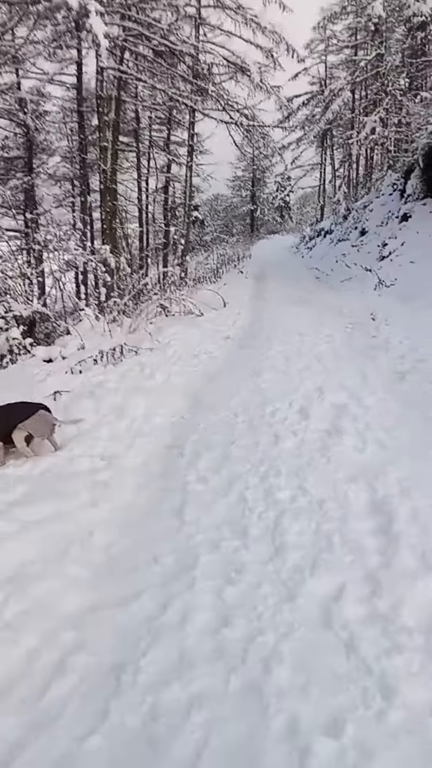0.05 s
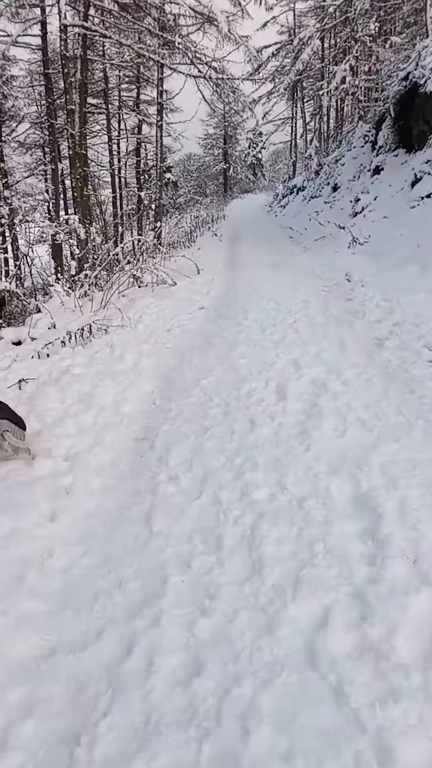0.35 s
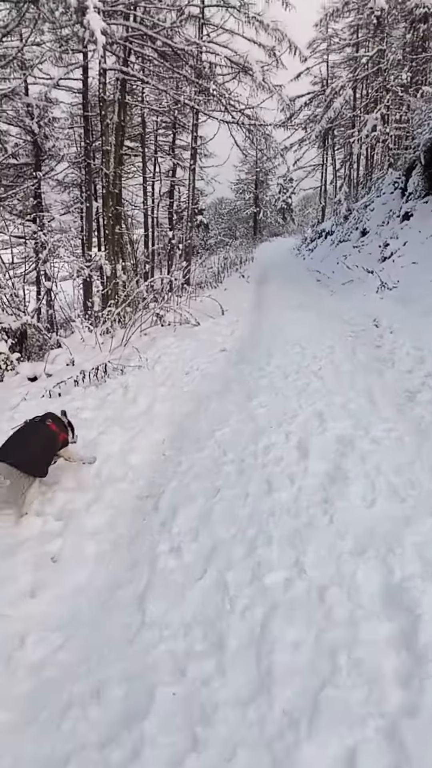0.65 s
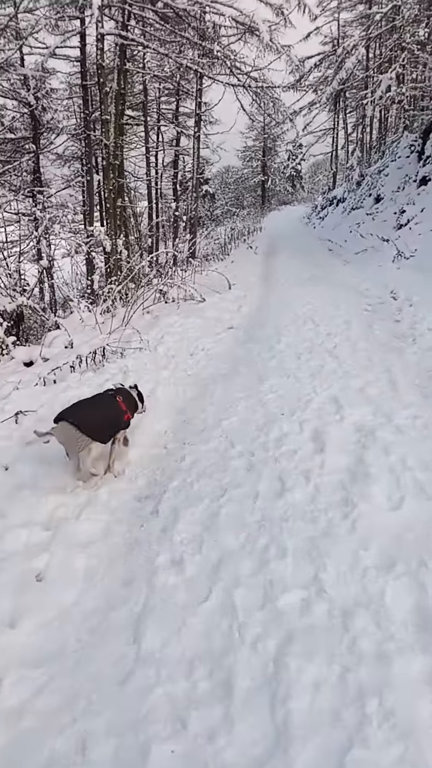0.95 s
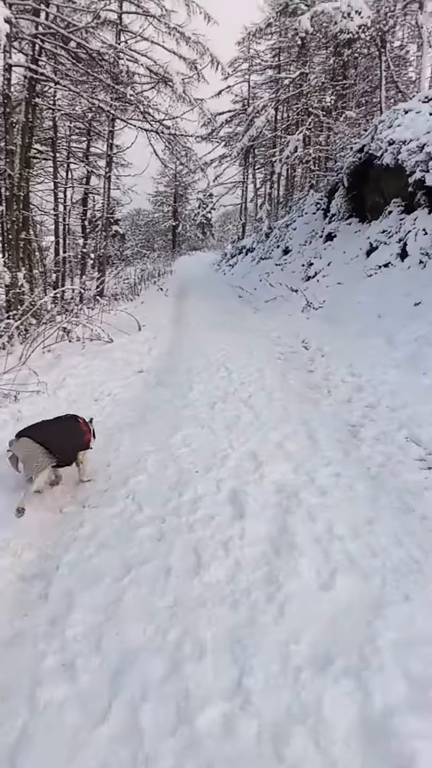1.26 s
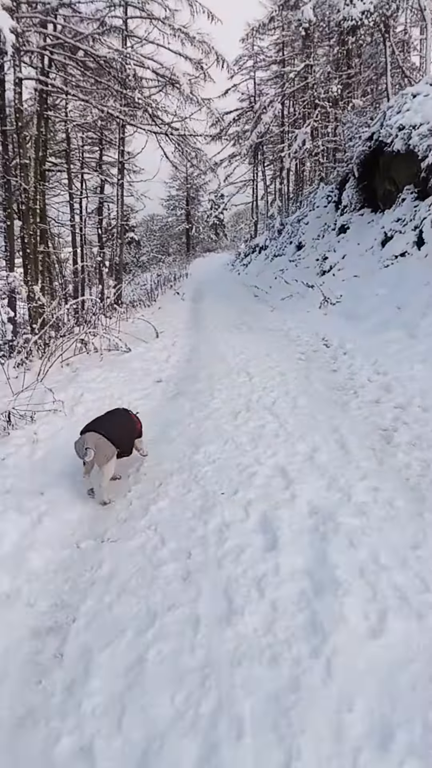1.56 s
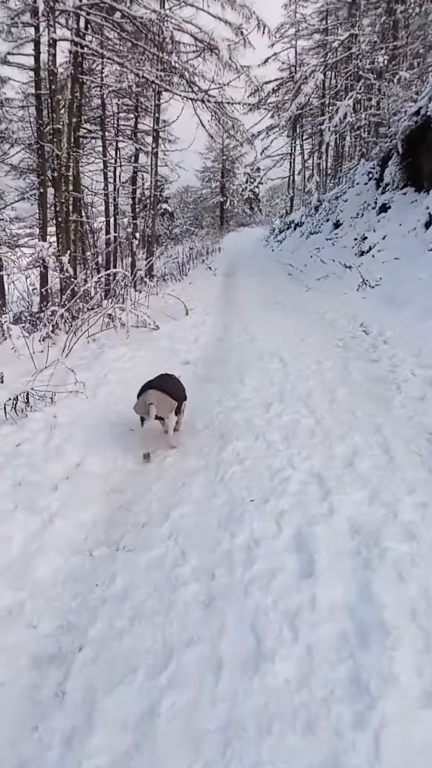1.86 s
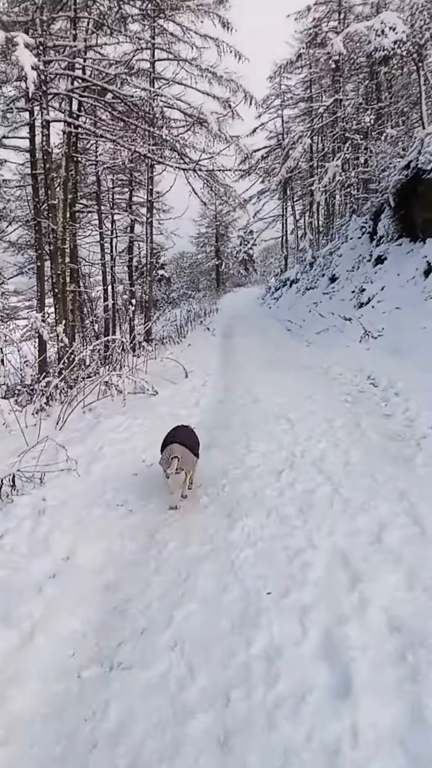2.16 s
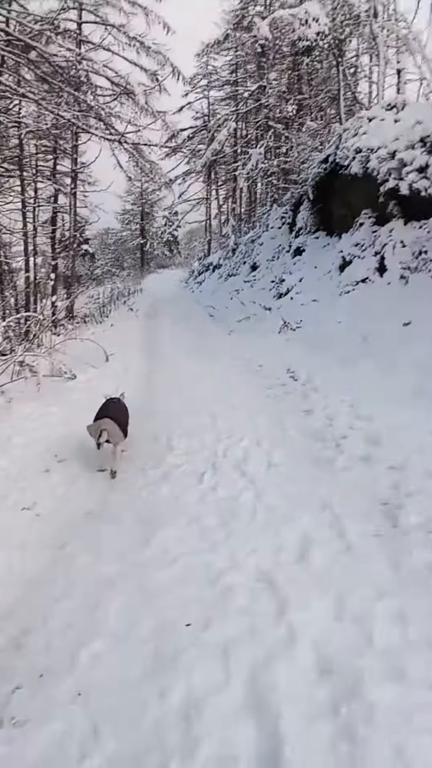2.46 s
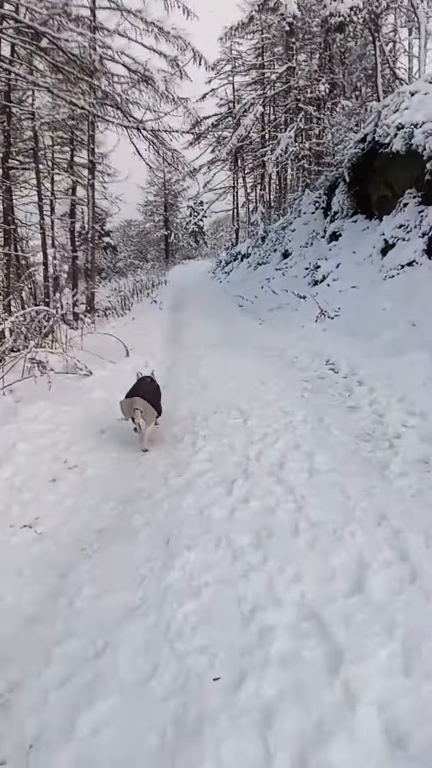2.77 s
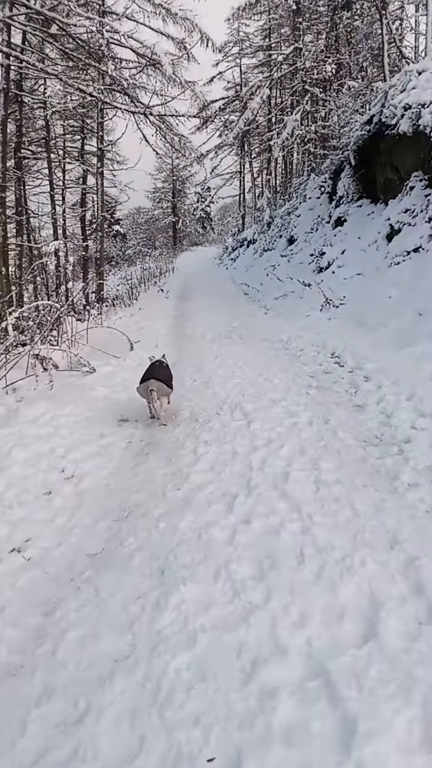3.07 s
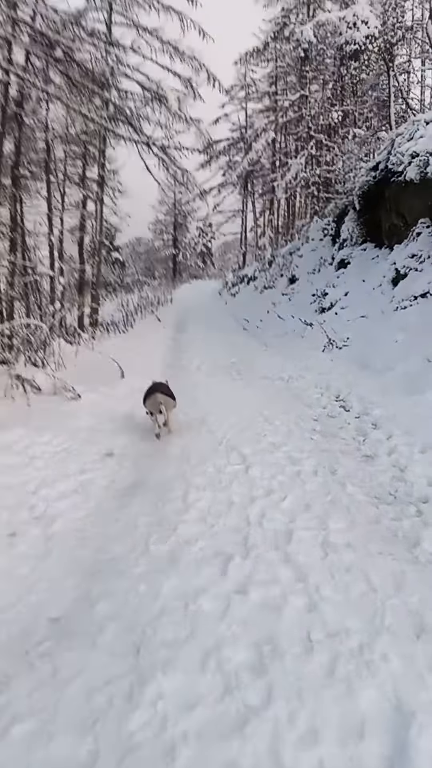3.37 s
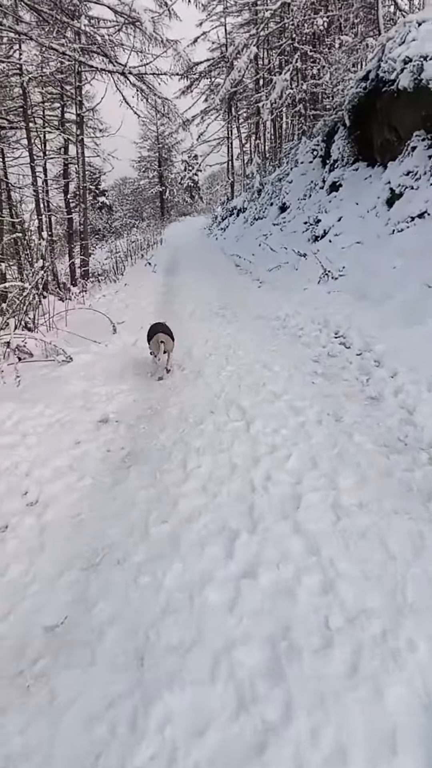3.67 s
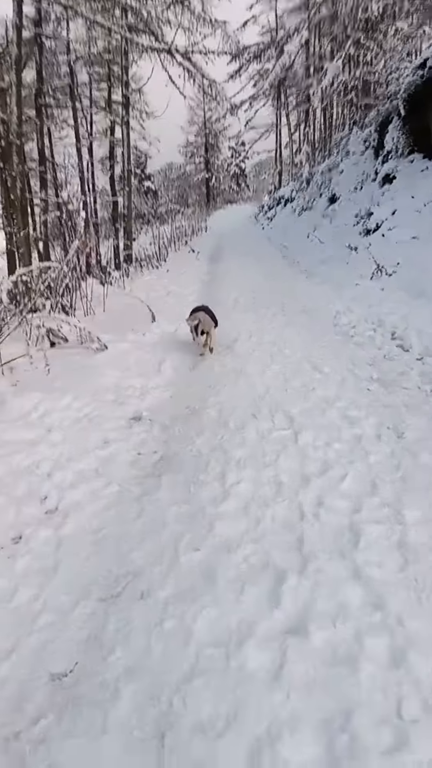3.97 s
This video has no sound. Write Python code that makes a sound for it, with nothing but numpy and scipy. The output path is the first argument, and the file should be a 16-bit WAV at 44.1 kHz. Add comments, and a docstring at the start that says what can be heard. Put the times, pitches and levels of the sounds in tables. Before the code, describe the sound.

A brief rub of a hand on the phone opens a walk through snow in quiet woods. Close, regular footsteps follow, each breaking the crust and packing the snow with a dry crunch, some joined by small squeaks after about two seconds. Soft fabric swishes fall between the steps. Light wind rumbles unevenly on the handheld microphone throughout, with a faint hiss behind it and no echo.

```python
"""A walk along a snowy woodland track, phone in hand. At first the hand rubs the case as a boot lands.
Steps follow at an even pace, nearly two a second: the heel breaks the crust, then the sole packs the
snow with a dull crunch and a spray of powder, while lumps give way with short knocks and ice ticks.
Clothes swish between steps, and from about two seconds on firm snow squeaks under the twisting boot.
To the end, moving air buffets the microphone over a faint hiss."""
import sys
import numpy as np
from scipy import signal
from scipy.fft import rfft, irfft, next_fast_len
from scipy.io import wavfile
from scipy.ndimage import uniform_filter1d

SR = 44100
rng = np.random.default_rng(int(sys.argv[2]) if len(sys.argv) > 2 else 0)


def materialize(psi):
    """Save the field psi as 16-bit PCM at rate SR to the path in sys.argv[1].

    A 1-D psi becomes a single channel; in a 2-D psi each row is a channel.
    """
    bounded = np.clip(np.atleast_2d(psi).T, -1, 1)
    quanta = np.round(bounded * 32767).astype(np.int16)
    wavfile.write(sys.argv[1], SR, quanta)


N = 313992
TIME = np.arange(N) / SR

# Levels are relative within each table; each source applies its own gain afterwards.
# footfalls: (time [s], attack [s], sole press [s], release [s],
# heel level [dB], sole level [dB], grit relative to heel and sole [dB], powder level [dB])
FOOTFALLS = [(0, 0.071, 0.049, 0.1, -46.5, -52, -5, -53), (0.523, 0.028, 0.11, 0.04, -45, -48.5, -3.5, -51),
             (1.054, 0.02, 0.11, 0.039, -69, -47.5, -1, -53),
             (1.625, 0.048, 0.11, 0.075, -48, -47, -7, -51),
             (2.181, 0.015, 0.13, 0.076, -78, -45.5, -2, -50.5),
             (2.712, 0.062, 0.095, 0.065, -64, -45, -5.5, -53),
             (3.308, 0.028, 0.12, 0.057, -50, -49, -4.5, -53),
             (3.885, 0.017, 0.093, 0.097, -46, -49, -8.5, -51),
             (4.457, 0.034, 0.11, 0.059, -42.5, -52.5, -6.5, -51.5),
             (5.003, 0.017, 0.16, 0.022, -42.5, -46.5, -6.5, -52),
             (5.566, 0.023, 0.16, 0.015, -37, -51, -8, -52.5),
             (6.146, 0.017, 0.089, 0.1, -39.5, -47, -7, -52.5),
             (6.613, 0.032, 0.081, 0.04, -72, -47.5, -1, -57.5)]
# spectrum of snow collapsing at depth: (frequency [Hz], level [dB])
GROAN_SPECTRUM = [(130, -32), (220, -3), (330, 6), (520, 5.5), (700, 3), (830, -0.5), (1000, -63),
                  (2500, -60)]
# spectrum of the breaking crust: (frequency [Hz], level [dB])
GRIT_SPECTRUM = [(600, -23), (950, -5.5), (1300, 5.5), (2000, -1.5), (2650, -0.5), (3100, -19),
                 (4000, -3.5), (6000, -41)]
# spectrum of spraying crystals: (frequency [Hz], level [dB])
POWDER_SPECTRUM = [(500, -2), (1000, -1.5), (2600, -2.5), (7000, -0.5), (10000, -3.5), (12000, -7),
                   (16000, -10.5)]
# knocks of lumps under the boot and of the hand on the case: (time [s], level [dB], pitch [Hz])
LUMP_KNOCKS = [(.158, -14.5, 820), (.386, -33, 392), (.52, -30, 480), (1.069, -21.5, 690),
               (1.089, -29, 790), (1.108, -24, 590), (1.605, -25.5, 387), (2.168, -32.5, 874),
               (2.2025, -26, 394), (2.245, -29, 620), (2.269, -30, 563), (2.719, -17, 684),
               (2.734, -38, 650), (2.7695, -37, 444), (2.777, -23.5, 422), (2.891, -36, 490),
               (3.340, -27.5, 654), (3.9, -30.5, 1340), (4.435, -39, 400), (4.476, -24, 630),
               (4.493, -29.5, 480), (5.0075, -27.5, 580), (5.042, -31.5, 404), (5.565, -31, 487),
               (5.572, -24, 1230), (5.606, -33, 517), (6.147, -31, 680), (6.178, -31, 485),
               (6.61, -30.5, 760), (6.634, -27, 480), (6.663, -28, 790)]
# sharp ticks of ice and of the hand on the case: (time [s], level [dB], pitch [Hz])
ICE_TICKS = [(.0805, -30.5, 3730), (.1587, -29, 1410), (.1795, -24.5, 4970), (.5665, -23, 4430),
             (.646, -35, 1370), (1.9945, -41.5, 7200), (2.2027, -31.5, 2200), (2.7193, -30, 1680),
             (3.4285, -27.5, 13000), (3.9885, -28, 12500), (5.105, -41, 2460), (5.926, -47.5, 2570),
             (6.252, -35, 13300)]
# squeaks of packed snow: (time [s], duration [s], level [dB], pitch [Hz])
SNOW_SQUEAKS = [(2.23, .035, -58, 1800), (2.697, .025, -58, 2050), (2.895, 0.047, -59, 563),
                (2.905, 0.044, -71, 1020), (3.076, 0.042, -66.5, 540), (3.288, 0.063, -65.5, 1070),
                (3.89, .02, -56, 2300), (4.475, 0.011, -51, 1270), (4.81, 0.044, -71, 1095),
                (5.136, 0.059, -65, 610), (5.139, 0.039, -61.5, 1220), (5.502, 0.03, -69.5, 1160),
                (5.569, 0.011, -46.5, 1520), (6.577, 0.036, -62, 850), (6.662, 0.016, -53.5, 1870),
                (6.694, 0.064, -59, 644)]
# slides of the hand on the case: (time [s], duration [s], starting level [dB], slope [dB/s])
HAND_RUBS = [(.005, 0.086, -49.5, -28), (0.157, 0.012, -39, -250), (0.1775, 0.057, -37.5, 75),
             (0.23, 0.14, -53.5, -67), (0.386, 0.045, -43.5, -500), (0.438, 0.012, -43.5, -150)]
# spectrum of skin friction: (frequency [Hz], level [dB])
RUB_SPECTRUM = [(300, 4.5), (750, 2.5), (2800, -4.5), (5500, 0.5), (8500, -9.5), (16000, -6)]
# the narrowing hollow between hand and microphone port: (time [s], resonance [Hz])
HAND_HOLLOW = [(.08, 6320), (.44, 7670)]
# swishes as the legs and arms pass: (centre time [s], half duration [s], level [dB])
CLOTH_SWISHES = [(0.806, 0.17, -70.5), (1.228, 0.033, -63.5), (1.985, 0.26, -66), (2.61, 0.11, -67),
                 (2.91, 0.073, -71), (3.096, 0.15, -70), (3.61, 0.012, -67), (3.672, 0.032, -62.5),
                 (4.146, 0.027, -67.5), (4.219, 0.071, -62.5), (4.423, 0.038, -63), (4.81, 0.074, -65),
                 (5.32, 0.13, -70.5), (5.875, 0.065, -64), (6.112, 0.068, -63.5), (6.39, 0.057, -66.5),
                 (6.512, 0.035, -72), (6.75, 0.042, -57.5), (6.927, 0.028, -68), (7.023, 0.044, -64.5)]
# spectrum of fabric friction: (frequency [Hz], level [dB])
CLOTH_SPECTRUM = [(200, -3), (600, 9.5), (1000, 4), (1800, 5.5), (4500, 4.5), (7300, 6), (9500, -2.5),
                  (16000, -2)]
# buffets of air on the microphone: (time [s], duration [s], level [dB])
AIR_BUFFETS = [(0.23, 0.18, -45.5), (0.397, 0.26, -48.5), (0.691, 0.079, -48.5), (0.894, 0.024, -55.5),
               (1.031, 0.12, -53), (1.212, 0.069, -52.5), (1.453, 0.4, -43), (1.833, 0.27, -49),
               (2.15, 0.13, -43), (2.328, .11, -46.5), (2.511, 0.28, -56), (2.877, 0.14, -55.5),
               (3.067, 0.14, -58.5), (3.657, 0.02, -50), (3.724, 0.065, -56), (3.978, 0.19, -43.5),
               (4.323, 0.12, -51.5), (4.504, 0.099, -57), (4.987, 0.14, -48), (5.532, 0.28, -49),
               (5.734, 0.096, -41.5), (5.818, 0.13, -43.5), (5.98, 0.23, -49.5), (6.153, 0.2, -49),
               (6.395, 0.14, -50.5), (6.603, 0.11, -55), (6.802, 0.235, -55.5)]
# single eddies striking the microphone: (centre time [s], level [dB], pitch [Hz])
AIR_EDDIES = [(0.29, -35.5, 128), (0.352, -39, 96.4), (0.56, -41, 238), (0.75, -51, 147),
              (1.289, -40.5, 96), (1.406, -41, 79.4), (1.477, -33.5, 128.7), (1.5, -40.5, 219),
              (1.566, -35, 224), (1.613, -40, 147), (1.851, -41, 220), (1.922, -38.5, 90),
              (1.981, -41.5, 80), (2.337, -40, 96), (2.423, -53.5, 198), (2.678, -43, 136),
              (4.017, -42, 119), (4.085, -32, 130.3), (4.352, -45.5, 81.4), (5.003, -40.5, 237),
              (5.565, -35, 232), (5.658, -44.5, 200), (5.75, -34.5, 119), (5.792, -31, 121.4),
              (6.172, -35, 229), (6.264, -36.5, 180), (6.342, -39, 343), (6.523, -43.5, 156)]
# spectrum of turbulence at the port: (frequency [Hz], level [dB])
WIND_SPECTRUM = [(20, -91), (50, -10), (75, -3.5), (125, 2.5), (165, -7), (220, -17), (320, -59),
                 (600, -60)]
# spectrum of the open air: (frequency [Hz], level [dB])
AIR_SPECTRUM = [(20, -31), (60, 17.5), (130, -9), (250, 11.5), (550, 6), (1000, 0.5), (7000, -1),
                (16000, -10.5)]
# response of the microphone port, resonant near 7 and 15 kHz: (frequency [Hz], gain [dB])
PORT_RESPONSE = [(4800, -4), (6000, 2), (7250, 6), (8100, -9.5), (10000, -3.5), (11200, -10), (13800, -11),
                 (15000, 8), (15800, -5)]

HEEL_HOLD_S, HEEL_RELEASE_S = 0.017, 0.052
HEEL_GRIT_DB, HEEL_SPRAY_DB = 2.5, -8.5  # the heel cracks extra crust and kicks up a little powder
CUSHION_S = 0.0013  # soft snow gives this long before the crust breaks
PACKING_DB_PER_S = -51  # the sole quietens as the snow firms up
POWDER_LAG_S, POWDER_ARCH_DB, POWDER_DB_PER_S = 0.008, 5, -8.5  # the spray is fullest in mid-roll
CUTOFF_HZ = 15900


def footsteps():
    """Brittle collapse: many small failures sum to a deep groan, a gritty crust and a powder spray."""
    weight, breaking, spray = tread()
    collapses = grains(per_s=520, spread_db=2.8)
    crust = collapses + slips() + from_db(3) * grains(per_s=1400, spread_db=3)
    groan = flicker(colour(boot_reflection(collapses), GROAN_SPECTRUM), depth_db=4.5, per_s=35, bands=21)
    grit = flicker(colour(boot_reflection(crust), GRIT_SPECTRUM), depth_db=4.5, per_s=35, bands=31)
    crystals = colour(grains(per_s=8300, spread_db=2.0), POWDER_SPECTRUM)
    crystals = flicker(crystals, depth_db=3.5, per_s=50)
    groan = weight * steady(groan, 280, 900, window_s=0.025)
    grit = breaking * steady(grit, 1000, 2900, window_s=0.03)
    crystals = spray * steady(crystals, 3300, 8000, window_s=0.025)
    return from_db(-1.5) * groan + from_db(-5.5) * grit + from_db(-7.5) * crystals


def tread():
    """Incoherent addition: heel and sole sum in power into envelopes of packing, breaking and spray."""
    weight = breaking = spray = 0
    for s, attack, press, release, heel_db, sole_db, grit_db, powder_db in FOOTFALLS:
        heel = from_db(heel_db) * swell(s, HEEL_HOLD_S, attack, HEEL_RELEASE_S)
        cushion = from_db(heel_db) * swell(s - CUSHION_S, HEEL_HOLD_S + CUSHION_S, attack, HEEL_RELEASE_S)
        sole = from_db(sole_db) * swell(s, press, attack, release, PACKING_DB_PER_S)
        roll = np.clip((TIME - s) / (press + release / 2), 0, 1)
        spray_s = press - POWDER_LAG_S + 0.24 * release
        powder = swell(s + POWDER_LAG_S, spray_s, 1.7 * attack, 1.02 * release, POWDER_DB_PER_S)
        powder *= from_db(powder_db + POWDER_ARCH_DB * np.sin(np.pi * roll))
        weight += np.hypot(cushion, sole)
        breaking += from_db(grit_db) * np.hypot(from_db(HEEL_GRIT_DB) * heel, sole)
        spray += np.hypot(powder, from_db(HEEL_SPRAY_DB) * heel)
    judder = from_db(3.5 * drift(per_s=70))  # the snow yields in small jerks
    return judder * weight, judder * breaking, np.sqrt(judder) * spray


def boot_reflection(x, delay_s=0.00046, gain_db=-8):
    """Comb filtering: a close reflection off the boot hollows the sound near 1 and 3 kHz."""
    return x + from_db(gain_db) * np.interp(TIME - delay_s, TIME, x)


def knocks():
    """Radiation from a small source: lumps give way with short knocks that carry little bass."""
    fractures = snaps(LUMP_KNOCKS, rise_cycles=0.46, edge_db=-15, sag=0.089)
    return from_db(-4) * butterworth(boot_reflection(fractures), 170, "high")


def snaps(table, rise_cycles, edge_db, sag=0):
    """Heavy damping: each snap dies in a few cycles, with a noisy edge; sag lets its pitch fall."""
    out, t = np.zeros(N), TIME[:SR // 20]
    for s, db, hz in table:
        edge = butterworth(rng.standard_normal(len(t)), min(2 * hz, CUTOFF_HZ))
        age = t * hz / rise_cycles
        phase = 2 * np.pi * np.cumsum(hz / (1 + sag * age)) / SR
        envelope = from_db(db) * age * np.exp(1 - age)
        snap = envelope * (np.sin(phase) + from_db(edge_db) * edge / np.std(edge))
        start = int(s * SR)
        out[start:start + len(t)] += snap[:N - start]
    return out


def squeaks(relative_bandwidth=0.24, fade_s=0.014):
    """Forced resonance: firm snow slipping under a twisting boot rings a rough, short-lived note."""
    out, friction = 0, slips() + grains(per_s=900, spread_db=2)
    band_edges = np.exp([-relative_bandwidth / 2, relative_bandwidth / 2])
    for s, length, db, hz in SNOW_SQUEAKS:
        note = butterworth(friction, hz * band_edges, "band")
        out += from_db(db) * swell(s, length, fade_s, fade_s) * note / np.std(note)
    return out


def slips(per_s=360, jitter=0.3):
    """Stick-slip motion: a nearly regular train of uneven pulses whose pace wanders; rms 1."""
    pace = per_s * np.exp(jitter * drift(per_s=60))
    slip_count = np.floor(np.cumsum(pace) / SR)
    pulses = np.diff(slip_count, prepend=0) * rng.uniform(0.3, 1, N)
    return (pulses - pulses.mean()) / np.std(pulses)


def handling():
    """Friction and cavity resonance: skin rasps on the case as the hand's hollow rings, rising."""
    rasp = colour(grains(per_s=5000, spread_db=5.0), RUB_SPECTRUM)
    rasp = steady(rasp, 1900, 9900, window_s=0.013)
    ring = noisy_resonance(np.interp(TIME, *np.transpose(HAND_HOLLOW)), half_width_hz=800)
    pressure = sum(from_db(db) * swell(s, length, attack_s=0.004, release_s=0.018, db_per_s=slope)
                   for s, length, db, slope in HAND_RUBS)
    return pressure * (from_db(-7.5) * rasp + from_db(-3.5) * ring)


def clothing():
    """Sliding friction: fabric brushes fabric in soft, uneven swells as the limbs pass."""
    strides = sum(from_db(db) * np.exp(-np.minimum(((TIME - s) / half) ** 2 / 2, 20))
                  for s, half, db in CLOTH_SWISHES)
    weave = colour(grains(per_s=2000, spread_db=1.5), CLOTH_SPECTRUM)
    weave = flicker(weave, depth_db=3.5, per_s=14)
    folds = from_db(2.2 * drift(per_s=35))
    return from_db(-1.5) * folds * strides * weave / np.std(weave)


def wind():
    """Turbulent pressure: eddies thud on the port over a low flow, and hard ones overdrive it."""
    strength = airflow()
    rumble = steady(colour(rng.standard_normal(N), WIND_SPECTRUM), 45, 160, window_s=0.018)
    air = from_db(-3) * strength * rumble
    t = TIME[:SR // 4] - 1 / 8  # centred on the eddy
    for s, db, hz in AIR_EDDIES:
        envelope = from_db(db) * np.exp(-(t * hz / 1.4) ** 2 / 2)
        eddy = envelope * np.cos(2 * np.pi * (hz * t + rng.random()))
        start = int((s + t[0]) * SR)
        air[start:start + len(t)] += eddy[:N - start]
    overdrive = butterworth(air ** 2, 150, "high")  # square-law distortion reaches higher in pitch
    return air + from_db(27.5) * overdrive


def airflow(draught_db=-68.5):
    """Intermittency: separate buffets, each tumbling unevenly, rise above the draught of walking."""
    buffets = [from_db(db) * swell(s, length, attack_s=0.025, release_s=0.03)
               for s, length, db in AIR_BUFFETS]
    tumble = from_db(5.5 * drift(per_s=26))
    return tumble * np.maximum(from_db(draught_db), np.max(buffets, axis=0))


def woods():
    """Stationary noise: the faint, even hiss and rumble of the open air."""
    air = colour(rng.standard_normal(N), AIR_SPECTRUM)
    return from_db(-71.5) * air / np.std(air)


def grains(per_s, spread_db):
    """Shot noise: clicks at random moments with uneven sizes and signs; rms 1."""
    born = rng.random(N) < per_s / SR
    sizes = from_db(spread_db * np.minimum(rng.exponential(1, N), 4))
    clicks = born * sizes * rng.choice([-1, 1], N)
    return clicks / np.std(clicks)


def noisy_resonance(hz, half_width_hz):
    """Ring modulation: low-passed noise times a sine gives a narrow band around a moving pitch."""
    blur = butterworth(rng.standard_normal(N), half_width_hz)
    return blur / np.std(blur) * np.sin(2 * np.pi * np.cumsum(hz) / SR)


def flicker(x, depth_db, per_s, bands=16):
    """Amplitude modulation: each band swells and fades alone, as when pockets in snow open and close."""
    out, spectrum = 0, rfft(x)
    hz = np.clip(np.arange(len(spectrum)) * SR / N, 200, 6400)
    position = (bands - 1) / 5 * np.log2(hz / 200)  # bands spread evenly over five octaves
    for k in range(bands):
        band = irfft(spectrum * np.maximum(1 - abs(position - k), 0), N)
        out += band * from_db(depth_db * drift(per_s))
    return out


def drift(per_s):
    """Linear interpolation: a smooth wander through random values of spread 1."""
    knots = rng.standard_normal(int(N / SR * 200))
    return np.interp(TIME * per_s, np.arange(len(knots)), knots)


def swell(start, length, attack_s, release_s, db_per_s=0):
    """Growth and decay: gain reaches 1 at start, slopes, then dies; attack and release span 20 dB."""
    gain = np.zeros(N)
    near = slice(*np.searchsorted(TIME, [start - 4 * attack_s, start + length + 4 * release_s]))
    age = TIME[near] - start
    rise = np.maximum(-age, 0) / attack_s
    fall = np.maximum(age - length, 0) / release_s
    gain[near] = from_db(db_per_s * np.clip(age, 0, length) - 20 * (rise + fall ** 1.3))
    return gain


def steady(x, low_hz, high_hz, window_s):
    """Normalisation: dividing by one band's running rms evens the level but keeps the faster grain."""
    band = butterworth(x, [low_hz, high_hz], "band")
    size = int(window_s * SR)
    power = uniform_filter1d(uniform_filter1d(band ** 2, size), size)
    return x / np.sqrt(power + 1e-12)


def colour(x, spectrum):
    """Linear filtering: each frequency is weighted by a (frequency [Hz], gain [dB]) curve."""
    hz, db = np.transpose(spectrum)
    size = next_fast_len(N + SR // 10)
    bin_hz = np.maximum(np.arange(size // 2 + 1) * SR / size, 1)
    gain = from_db(np.interp(np.log(bin_hz), np.log(hz), db))
    return irfft(rfft(x, size) * gain, size)[:N]


def butterworth(x, hz, kind="low"):
    """Second-order filtering: a flat passband with skirts of 12 dB per octave."""
    return signal.sosfilt(signal.butter(2, hz, kind, fs=SR, output="sos"), x)


def from_db(db):
    """Logarithmic level: every 20 dB is a factor of ten in amplitude."""
    return np.exp(np.asarray(db) * (np.log(10) / 20))


def scene():
    """Superposition: snow absorbs echoes, so the sources simply add, all dry."""
    lumps = knocks()
    ticks = snaps(ICE_TICKS, rise_cycles=0.6, edge_db=-9)
    return (footsteps() + lumps + ticks + squeaks() + handling() + clothing() + wind() + woods())[None]


def record(dry):
    """Port resonance colours the treble, and a steep low-pass filter cuts the top."""
    coloured = colour(dry[0], [(2500, 0.026)] + PORT_RESPONSE)  # flat below 2.5 kHz
    top_cut = signal.ellip(10, 0.1, 70, CUTOFF_HZ, fs=SR, output="sos")
    return signal.sosfilt(top_cut, coloured)[None]


dry = scene()
out = record(dry)
materialize(out)
```